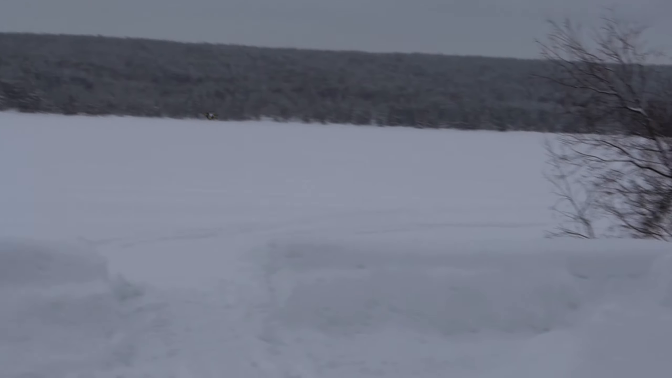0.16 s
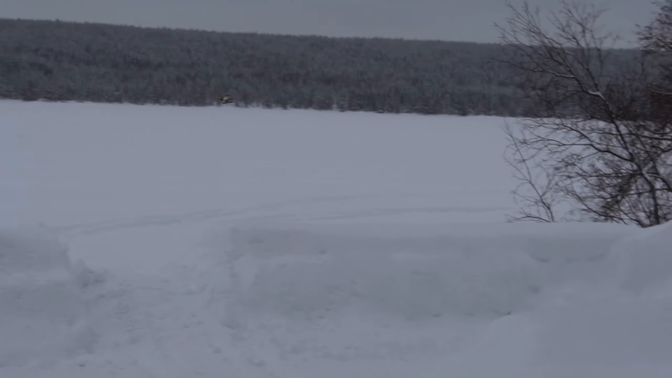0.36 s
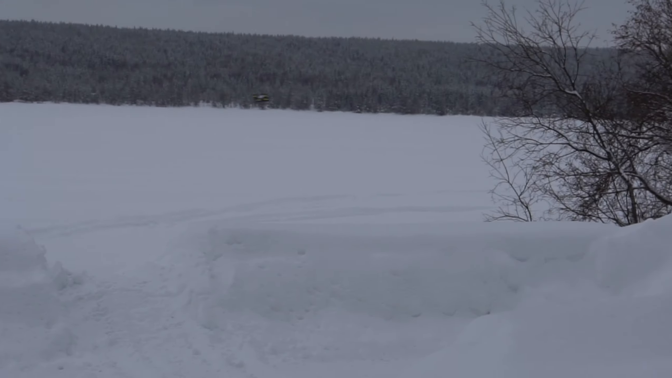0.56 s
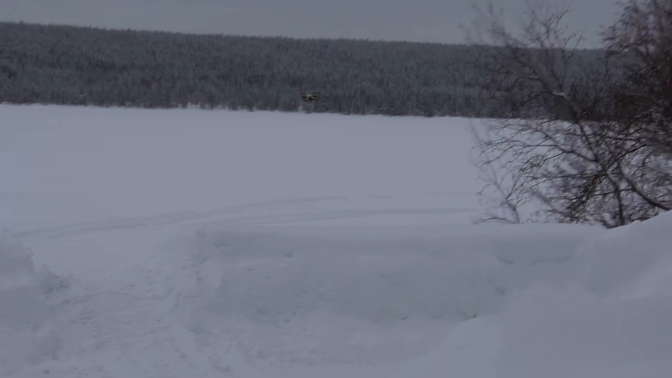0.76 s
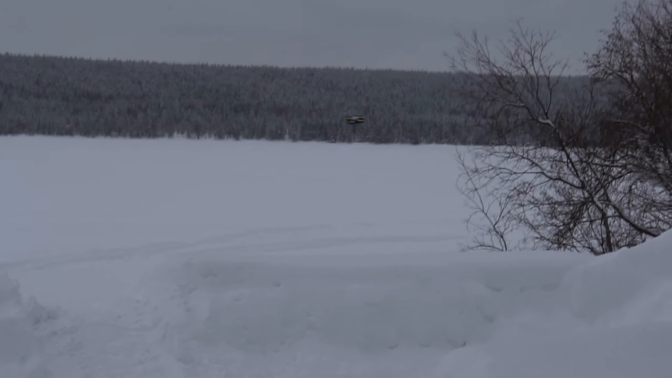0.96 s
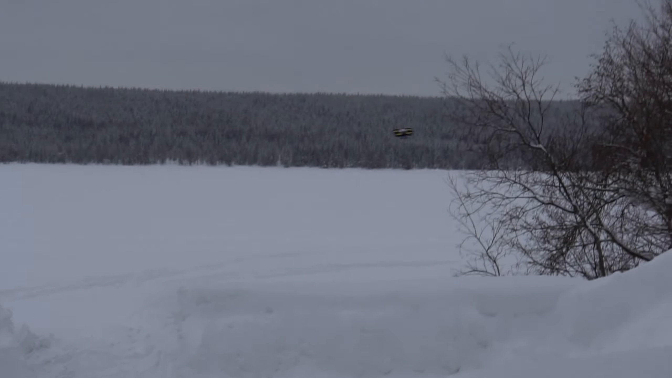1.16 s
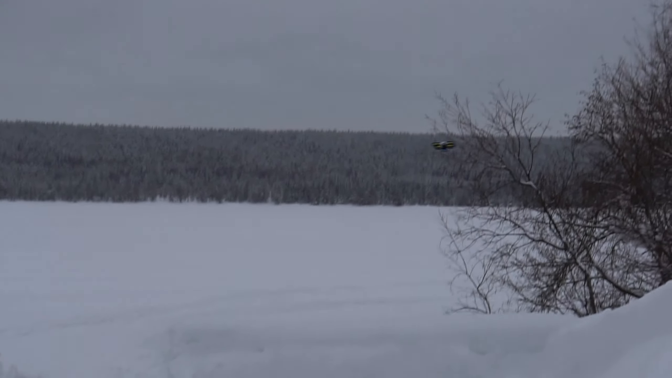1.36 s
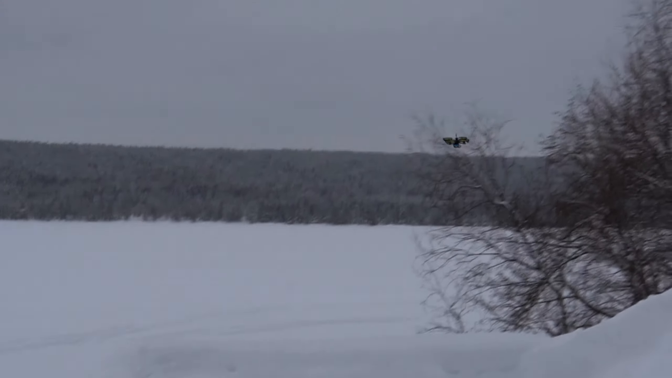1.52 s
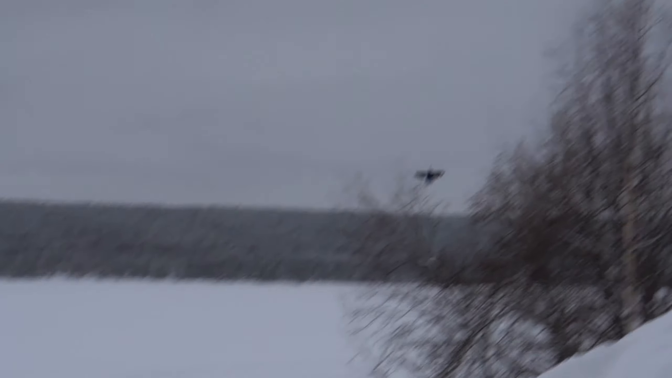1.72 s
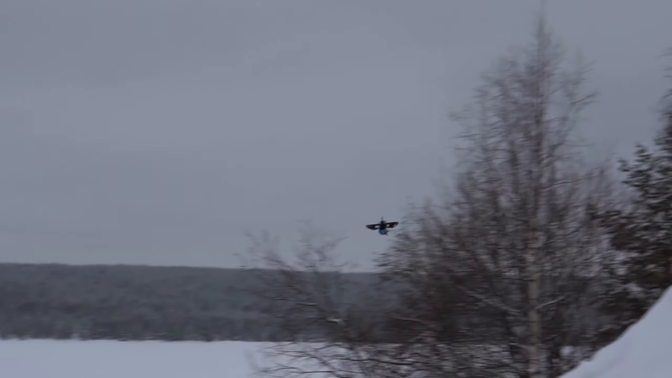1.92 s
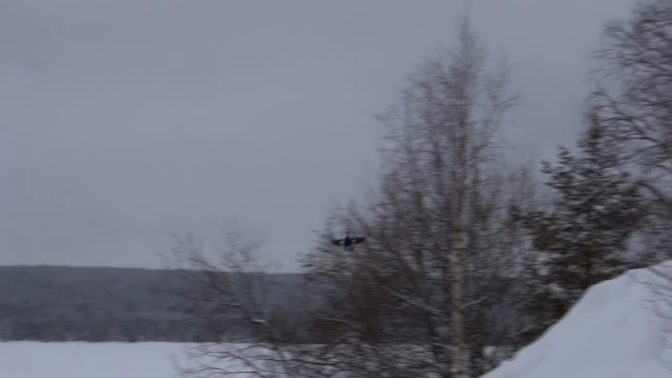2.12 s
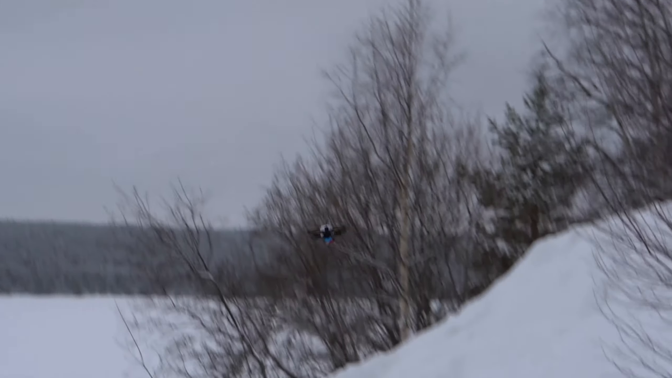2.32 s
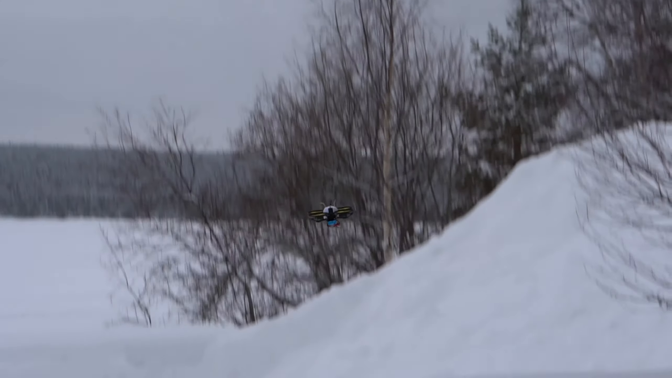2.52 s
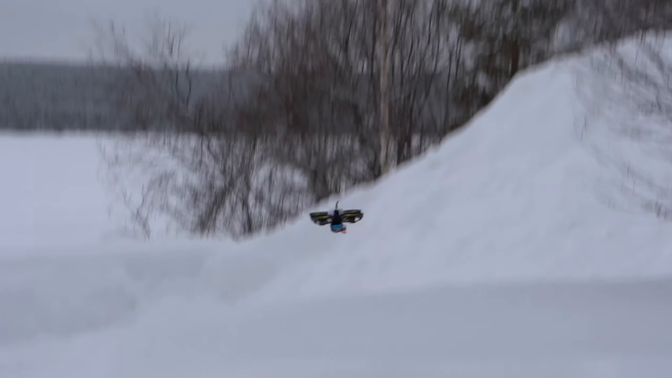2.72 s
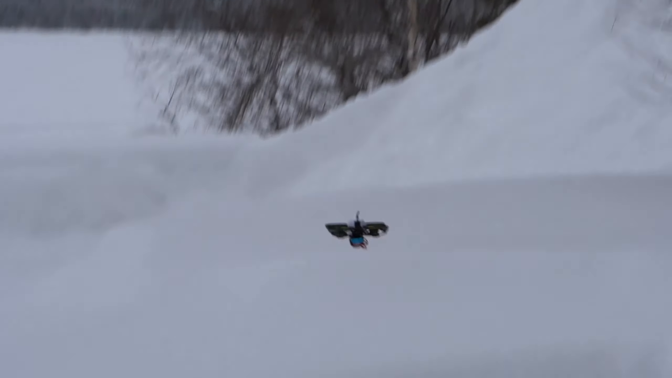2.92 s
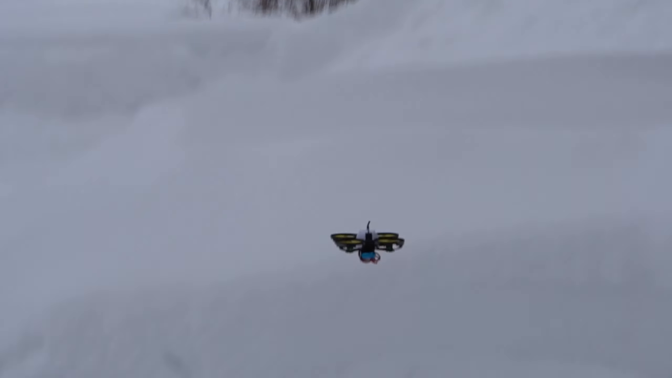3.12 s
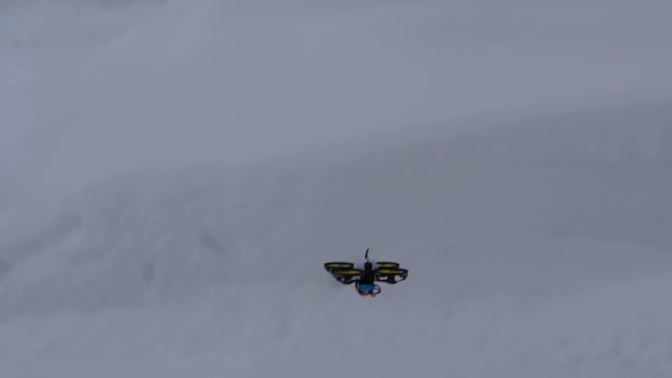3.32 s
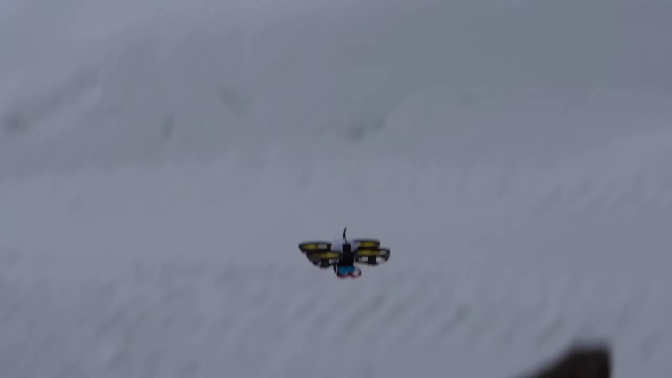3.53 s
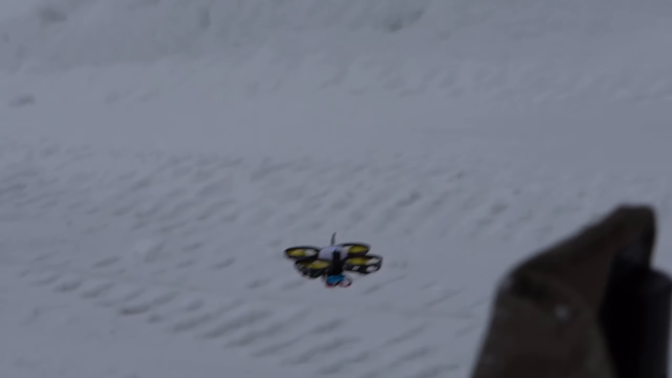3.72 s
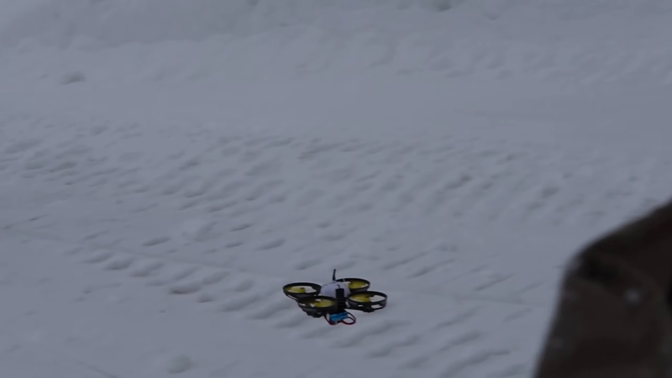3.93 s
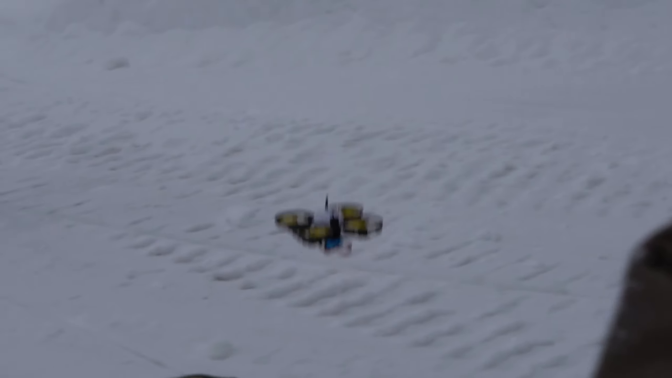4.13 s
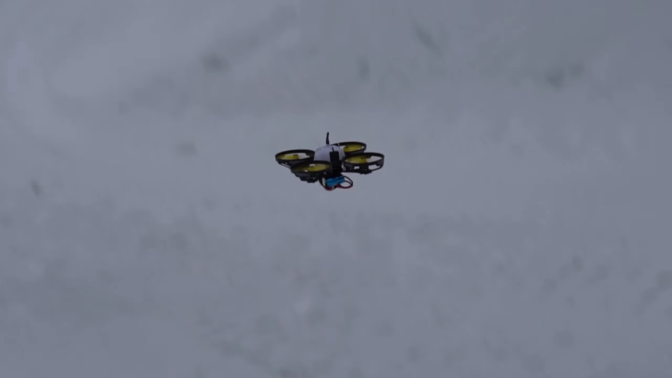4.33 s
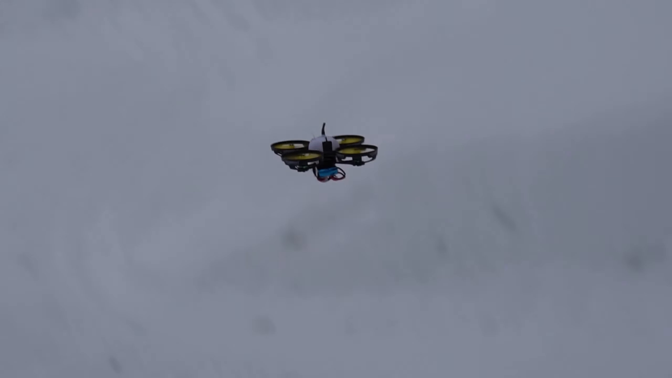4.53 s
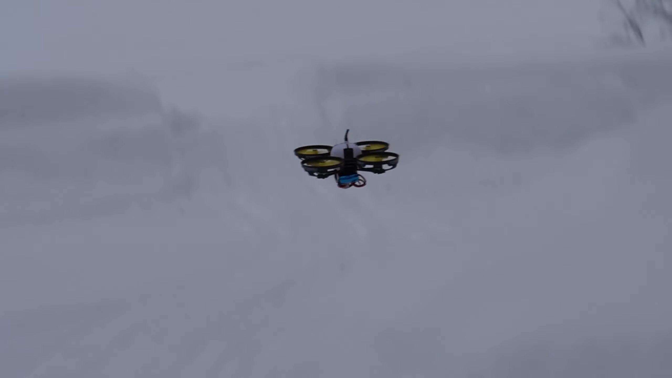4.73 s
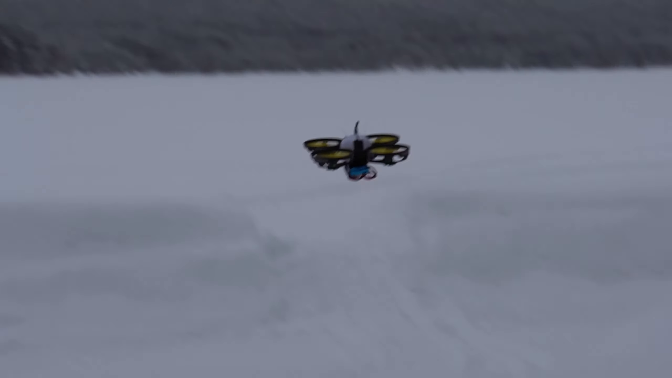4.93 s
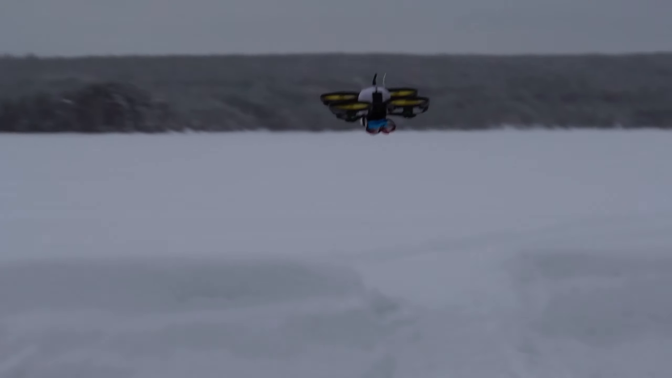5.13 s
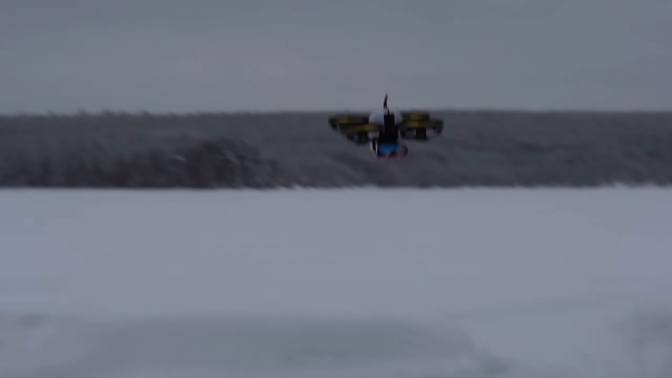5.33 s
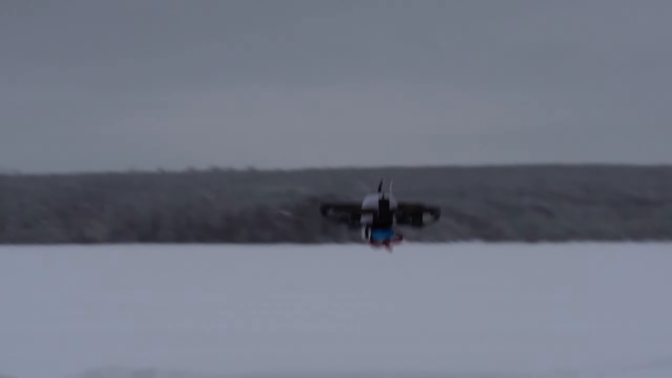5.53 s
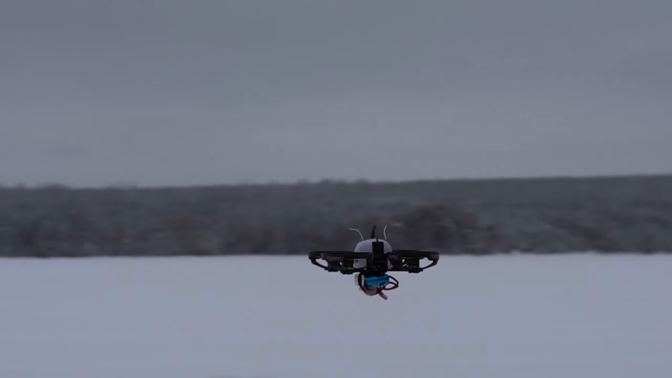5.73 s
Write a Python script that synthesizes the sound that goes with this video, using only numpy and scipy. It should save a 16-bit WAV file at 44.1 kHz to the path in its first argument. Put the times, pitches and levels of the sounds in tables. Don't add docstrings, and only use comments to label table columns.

```python
import sys
import numpy as np
from scipy import signal
from scipy.io import wavfile
from scipy.ndimage import uniform_filter1d

SR = 44100
rng = np.random.default_rng(int(sys.argv[2]) if len(sys.argv) > 2 else 0)


def digitize_waveform(pressure):
    field = np.atleast_2d(pressure).T
    bounded = np.clip(field, -1, 1)
    quanta = np.round(bounded * 32767).astype(np.int16)
    wavfile.write(sys.argv[1], SR, quanta)


def magnitude_from_level(level_db):
    exponent = np.asarray(level_db, float) / 20
    return 10 ** exponent


N = 258426

# (frequency [Hz], density [dB per Hz])
WIND_SPECTRUM = [(20, -4), (60, 4), (120, -4), (240, -3)]
# (time [s], peak level [dB])
KNOCK = [
    (.72, -50),
]
# (frequency [Hz], likeness [0-1])
MIC_LIKENESS = [(30, .3), (120, 0.97), (500, 1), (1500, 0.94), (3000, 0.7), (5000, 0.86), (9000, 0.77),
                (14000, 1)]
# (frequency [Hz], left minus right [dB])
MIC_LEAN = [(60, 0.0), (180, 12), (550, 0), (1650, -2), (4970, -1.5), (15000, -3.5)]
# (time [s], left minus right [dB])
BEARING_DB = [(0, .4), (.7, -1.2), (1.3, -2.8), (2.6, -2.3), (5.86, -2.3)]
# (frequency [Hz], density [dB per Hz])
ROAR_SPECTRUM = [(30, -62), (100, -48), (200, -51), (320, -16), (600, -7.5), (1200, -2.5), (2500, 1.5),
                 (4500, 3.5), (8000, 6)]
# (frequency [Hz], density [dB per Hz])
HISS_SPECTRUM = [(2000, -64), (4000, -1), (6000, 1), (8000, -2.5), (10500, 12.5), (12500, 14), (20000, -17)]
# (time [s], hiss level [dB], roar level [dB])
FLIGHT_DB = [(0, -40.5, -43.5), (.2, -42, -42.5), (.42, -44.5, -45.5), (.98, -42, -44),
             (1.12, -40.5, -42.5), (1.42, -40.5, -44), (1.8, -46.5, -44.5), (2.08, -44.5, -44),
             (2.24, -37, -40), (2.4, -38, -41.5), (2.95, -31, -36), (3.45, -28.5, -31.5),
             (3.68, -27, -31.5), (4.03, -22.5, -31.5), (4.55, -29.5, -33.5), (5.0, -30.5, -34),
             (5.25, -31.5, -36), (5.72, -26.5, -30)]
# (time [s], rotor 1 [Hz], rotor 2 [Hz])
REAR_HZ = [(0.0, 1382, 1364), (0.2, 1402, 1324), (0.4, 1165, 1085), (0.79, 1182, 1170), (0.96, 1182, 1148),
           (1.39, 1240, 1205), (1.61, 1015, 947), (2.09, 1016, 951.4), (2.48, 1045, 1041),
           (2.58, 1126, 1093), (3.62, 1170, 1157), (3.83, 1226, 1132), (4.13, 1416, 1395),
           (4.53, 1066, 1031), (4.82, 1002, 961.7), (5.31, 905, 844.4), (5.7, 1163, 1077),
           (5.86, 1182, 1061)]
# (time [s], rotor 3 [Hz], rotor 4 [Hz])
FRONT_HZ = [(0.0, 962, 970), (0.21, 961, 894), (0.4, 794, 725), (0.84, 813, 665), (1.38, 887, 743),
            (1.53, 742, 683), (1.86, 635, 591.5), (2.15, 627, 581), (2.49, 689.7, 616), (2.75, 748.8, 730),
            (3.22, 889.6, 851.5), (3.79, 1114, 1078), (4.12, 1156, 1080), (4.28, 1037, 978.4),
            (4.9, 986, 974.3), (5.3, 828.3, 801), (5.69, 1063, 997.7), (5.86, 1058, 996)]
# (time [s], half length [s], rear speed-up [%], front speed-up [%])
THROTTLE_JABS = [(0.148, 0.11, 6.0, 6), (0.608, 0.1, 1.15, 0.0), (1.151, 0.1, 4.0, 3.0),
                 (1.708, 0.098, 6.5, -1.1), (2.252, 0.1, 11.5, 16.5), (2.57, 0.074, -1.24, 1.1),
                 (2.95, 0.14, 3.5, 6), (3.351, 0.13, 6.5, 4), (3.961, 0.14, 5.5, 2.5),
                 (4.408, 0.057, 0.37, 3), (4.952, 0.13, 5, 3.5), (5.499, 0.074, 3.5, 0.1)]
# (time [s], level of rotors 1, 2, 3, 4 [dB each])
FACING_DB = [(.2, -47.5, -59, -55.5, -63), (.5, -57.5, -54, -66, -72), (.75, -48.5, -53, -66, -69),
             (1.25, -48.5, -50.5, -61, -83), (1.75, -52, -57.5, -68, -79), (2, -47.5, -55.5, -68, -59),
             (2.25, -41.5, -41, -51, -53), (2.5, -50, -39.5, -50.5, -50), (3, -34, -40.5, -42.5, -41.5),
             (3.17, -45, -37.5, -43.5, -43), (3.5, -36, -31, -41, -37), (3.75, -37, -39.5, -42.5, -45.5),
             (4.1, -29, -28, -43.5, -47.5), (4.5, -41, -32, -42, -39.5), (4.85, -40, -47.5, -41, -42),
             (5.25, -42.5, -52, -46.5, -54), (5.5, -37.5, -36, -36, -41.5), (5.86, -44.5, -35, -37, -36)]
# (time [s], rear octave re tone [dB], front octave re tone [dB])
TILT_DB = [(0, 0, 10), (.3, 0.5, 3), (1.2, 4.5, 4), (1.8, 4.5, 11), (2.2, -1, -2), (2.6, 0, -4),
           (3.28, 3, -3.5), (3.45, -3.5, 0.5), (4.1, -3.5, 4.5), (4.6, -4, -3), (5.1, -4, 3.5),
           (5.86, 3, -2)]
# (time [s], rear whine [dB], front whine [dB])
STRAIN_DB = [(0, -12, -8), (.4, -6, -6), (1.4, -6, -6), (1.6, 3, -6), (2.08, 6, -8), (2.2, -8, -6),
             (2.4, -3, 0), (2.7, -6, -2), (2.9, -2, -7), (3.45, -5, -2), (3.7, -8, -2), (4.0, -14, -10),
             (4.42, -12, -10), (4.55, 0, 3), (5.0, 3, 2), (5.2, 1, -1), (5.42, 4, -6), (5.86, -6, -3)]
MOTOR_WHINE_DB = [-14, -10, -13, -11]
REAR_ORDERS_DB = [-57, -54, -53, -54, -56, -58]
# (time [s], half length [s], blade order [multiple], lift [dB])
BANK_FLARES = [(.6, .9, 3, 9), (.1, .22, 4, 10), (.1, .25, 3, 6), (.9, .45, 4, 6), (1.0, .4, 6, 6),
               (3.2, .5, 4, 7), (3.0, .5, 6, 5), (3.1, .4, 8, 8), (3.55, .3, 3, 6), (2.9, .5, 7, 5),
               (4.0, .3, 5, 8), (4.0, .3, 7, 12), (4.5, .5, 3, 8), (5.75, .25, 4, 4)]
# (multiple of blade rate, level re roar [dB])
REAR_UPPER = [(9, -31), (10, -18.5)]
# (multiple of blade rate, level re roar [dB])
FRONT_UPPER = [(3, -17.5), (4, -22), (6, -34), (8, -36)]
# (multiple of shaft rate, relative level [dB])
SHAFT_ORDERS = [(1, 0), (2, -5.5), (4, 6)]
# (time [s], shaft tone level [dB])
WOBBLE_DB = [(0, -63), (.25, -61), (.5, -95), (.75, -69.5), (1.5, -70), (1.9, -84), (2.5, -66.5),
             (3, -55.5), (3.6, -63.5), (4, -52), (4.3, -57.5), (4.8, -56), (5.25, -83), (5.5, -56.5),
             (5.86, -52)]
# (frequency [Hz], width [Hz], lift [dB])
FRAME_RINGS = [(3450, 500, 3), (11700, 1500, 12), (14300, 900, 9)]


def rms_one(x):
    return x / np.sqrt(np.mean(x ** 2) + 1e-20)


def in_time(rows):
    times, *columns = np.transpose(rows)
    return np.array([np.interp(np.arange(N) / SR, times, column) for column in columns])


def at_hz(points, hz):
    table_hz, values = np.transpose(points)
    return np.interp(np.log(hz), np.log(table_hz), values)


def drift(rate):
    r = np.exp(-80 * np.pi * rate / SR)
    steps = rng.standard_normal(N // 40 + 2002)
    slow = signal.lfilter([1], [1, -2 * r, r * r], steps)[2000:]
    return np.interp(np.arange(N) / 40, np.arange(len(slow)), rms_one(slow))


def swell(time, half):
    u = np.linspace(-2.5, 2.5, 81)
    return np.interp(np.arange(N) / SR, time + half * u, np.exp(-np.abs(u) ** 3))


def banded_noise(spectrum, patchy_db):
    out, together = 0, drift(3.5)
    lowest, highest = spectrum[0][0], spectrum[-1][0]
    edges = lowest * 2 ** np.arange(0, np.log2(highest / lowest) + .4, .5)
    white = rng.standard_normal((2, 2, N))
    for k, (low, high) in enumerate(zip(edges, edges[1:])):
        band = signal.butter(2, [low, min(high, .45 * SR)], "band", fs=SR, output="sos")
        mid, side = signal.sosfilt(band, white[k % 2])
        hz = np.sqrt(low * high)
        alike = np.clip(at_hz(MIC_LIKENESS, hz), 0, 1)
        flicker_db = patchy_db * (0.31 * together + drift(9.3))
        lean_db = at_hz(MIC_LEAN, hz) / 2 * np.array([[1], [-1]])
        gain = magnitude_from_level(at_hz(spectrum, hz) + flicker_db + lean_db)
        out = out + gain * (np.sqrt(1 + alike) * mid + np.sqrt(1 - alike) * side * [[1], [-1]])
    return rms_one(out)


def wind():
    return magnitude_from_level(-95) * banded_noise(WIND_SPECTRUM, patchy_db=3.0)


def microphone_knock():
    t = np.arange(N) / SR
    shape = sum(magnitude_from_level(db) * np.exp(-((t - time) / 0.0074) ** 2) for time, db in KNOCK)
    body = signal.butter(4, [190, 330], "band", fs=SR, output="sos")
    return shape * rms_one(signal.sosfilt(body, rng.standard_normal(N))) / 3


def blade_rates():
    inertia_s = .045
    set_hz = np.r_[in_time(REAR_HZ), in_time(FRONT_HZ)]
    eased_hz = uniform_filter1d(set_hz, size=int(inertia_s * SR), mode="nearest")
    lift = 0
    for time, half, rear, front in THROTTLE_JABS:
        lift = lift + swell(time, half) * np.array([[rear], [front]]) / 100
    return eased_hz * (1 + lift[[0, 0, 1, 1]])


def blade_angles(rates, together, apart):
    throttle = together * drift(16)
    nudges = np.array([1 + throttle + own * drift(16) for own in apart])
    return 2 * np.pi * np.cumsum(rates * nudges, axis=1) / SR + rng.uniform(0, 99, (4, 1))


def downwash(angles, hiss_db, roar_db, air_db):
    gate = rms_one(1 + 0.23 * np.cos(angles[0]) + 0.3 * np.cos(angles[1]) + 0.45 * np.cos(angles[2]))
    hiss = banded_noise(HISS_SPECTRUM, patchy_db=0.28)
    high_pass = signal.butter(3, 12300, "high", fs=SR, output="sos")
    top = signal.sosfiltfilt(high_pass, hiss)
    hiss = hiss + (magnitude_from_level(air_db - 1) - 1) * top
    roar = banded_noise(ROAR_SPECTRUM, patchy_db=1.23)
    return magnitude_from_level(hiss_db + 5.5) * gate * hiss + magnitude_from_level(roar_db + 4.0) * roar


def frame_db(hz):
    grid = np.arange(0, SR / 2, 50)
    lift_db = sum(db * np.exp(-((grid - at) / width) ** 2) for at, width, db in FRAME_RINGS)
    return np.interp(hz, grid, lift_db)


def partial(angle, level_db, flutter_db, apart):
    return np.sqrt(2) * magnitude_from_level(level_db + flutter_db * drift(11.5)) * np.sin(angle + apart)


def rear_order_levels(thrust_db):
    orders_db = np.array(REAR_ORDERS_DB)[:, None] + .8 * thrust_db
    for time, half, order, db in BANK_FLARES:
        orders_db[round(order) - 3] += db * swell(time, half)
    return orders_db


def rotor_tones(rates, angles, thrust_db, roar_db):
    blade_db, tilt_db, strain_db = in_time(FACING_DB), in_time(TILT_DB), in_time(STRAIN_DB)
    shaft_db = in_time(WOBBLE_DB)[0]
    orders_db = rear_order_levels(thrust_db)
    out = 0
    for k, angle in enumerate(angles):
        pair = k // 2
        sway = drift(1.36) * np.array([[1], [-1]])
        out += partial(angle, blade_db[k], flutter_db=2.5, apart=.15 * sway)
        out += partial(2 * angle, blade_db[k] + tilt_db[pair], flutter_db=3.0, apart=.13 * sway)
        whine_db = roar_db + strain_db[pair] + MOTOR_WHINE_DB[k] + frame_db(12 * rates[k])
        out += partial(12 * angle, whine_db, flutter_db=2.5, apart=.2 * sway)
        for order, level_db in FRONT_UPPER if pair else REAR_UPPER:
            out += partial(order * (angle + k), roar_db + level_db + 4, flutter_db=2.5, apart=.3 * sway)
        if pair == 0:
            hidden_db = [3.5, -1.5][k]
            for order, level_db in enumerate(orders_db, 3):
                line_db = level_db + hidden_db + frame_db(order * rates[k])
                out += partial(order * (angle + k), line_db, flutter_db=2.0, apart=.2 * sway)
            for order, level_db in SHAFT_ORDERS:
                line_db = shaft_db + level_db - 10 * k
                out += partial(order * angle / 3, line_db, flutter_db=1.5, apart=.1 * sway)
    return out


def scene():
    hiss_db, roar_db = in_time(FLIGHT_DB)
    thrust_db = hiss_db + 34
    rates = blade_rates()
    angles = blade_angles(rates, together=.005, apart=[.003, .003, .008, .008])
    pan_db = in_time(BEARING_DB) * np.array([[.4], [-.4]])
    air_db = -7 + .18 * thrust_db
    air = downwash(angles, hiss_db, roar_db, air_db) * magnitude_from_level(pan_db + [[1], [-1]])
    tones = rotor_tones(rates, angles, thrust_db, roar_db) * magnitude_from_level(pan_db)
    return wind() + microphone_knock() + air + tones


def band_limit(x):
    return signal.sosfilt(signal.butter(12, 17010, fs=SR, output="sos"), x)


def record(dry):
    top_cut = signal.ellip(14, .3, 45, 15760, fs=SR, output="sos")
    mix = signal.sosfilt(top_cut, dry)
    return band_limit(mix)


dry = scene()
out = record(dry)
digitize_waveform(out)
```